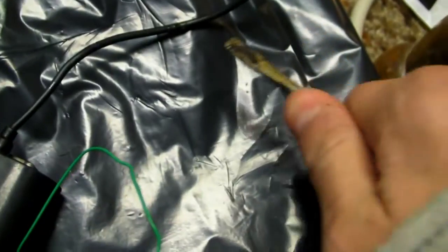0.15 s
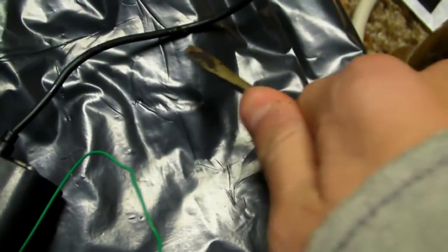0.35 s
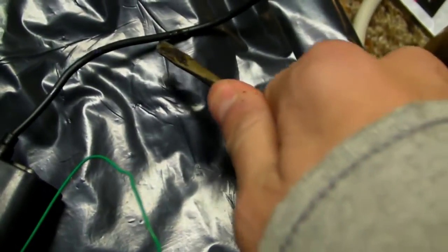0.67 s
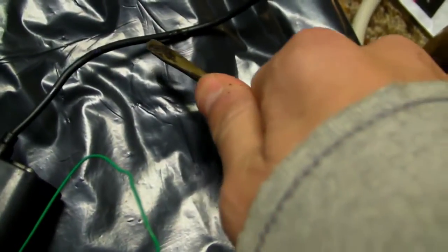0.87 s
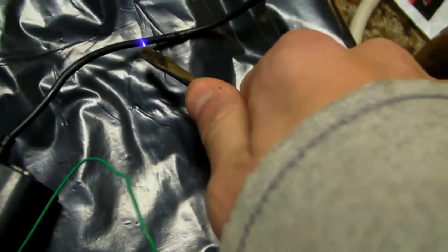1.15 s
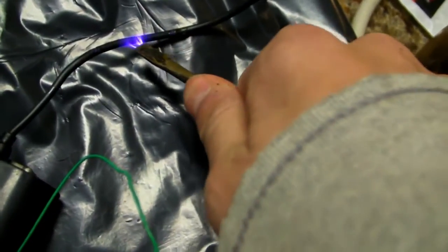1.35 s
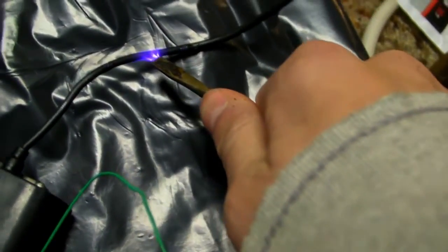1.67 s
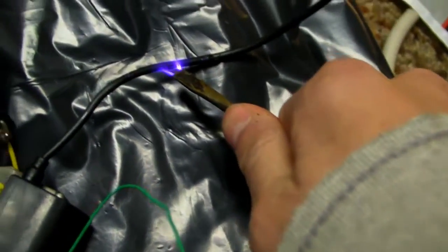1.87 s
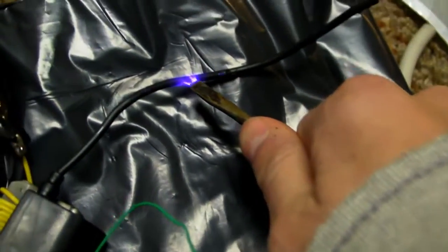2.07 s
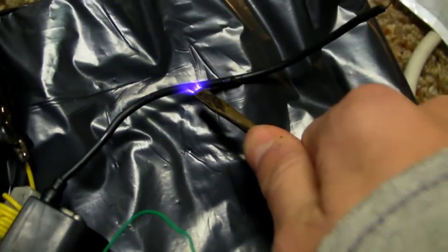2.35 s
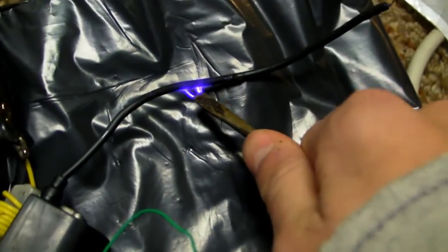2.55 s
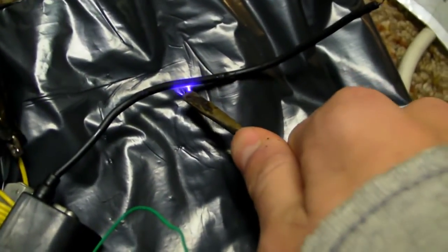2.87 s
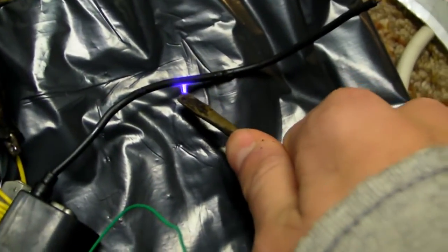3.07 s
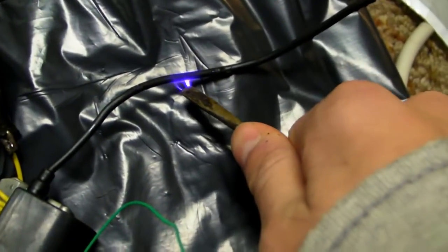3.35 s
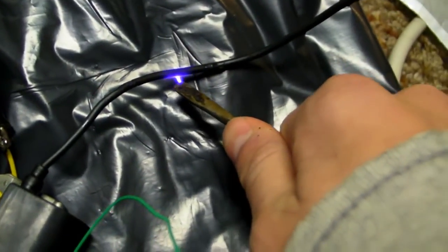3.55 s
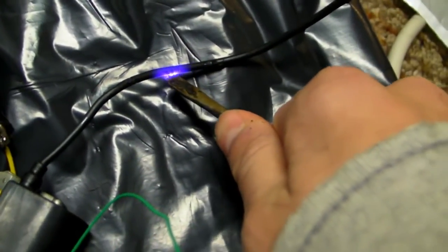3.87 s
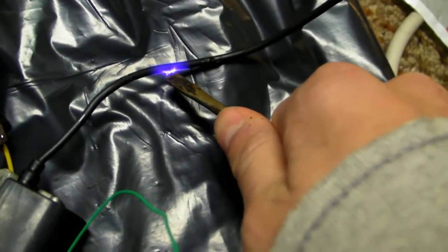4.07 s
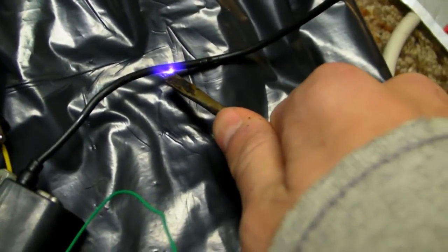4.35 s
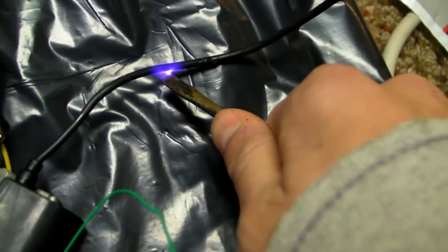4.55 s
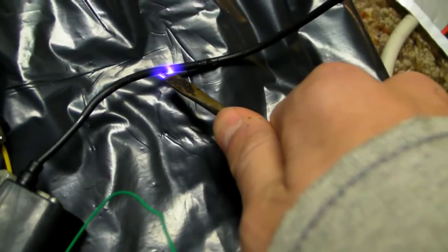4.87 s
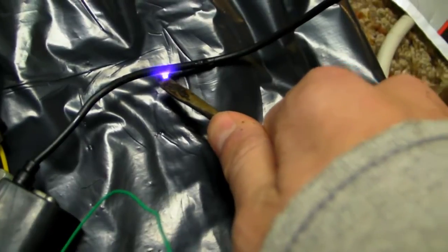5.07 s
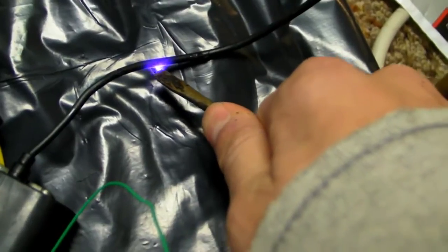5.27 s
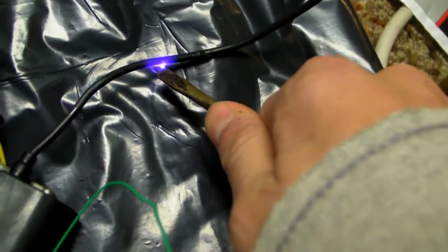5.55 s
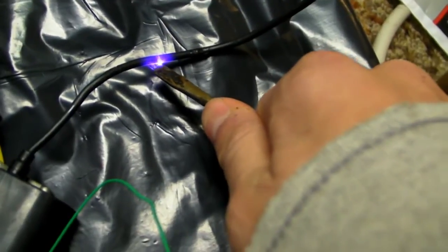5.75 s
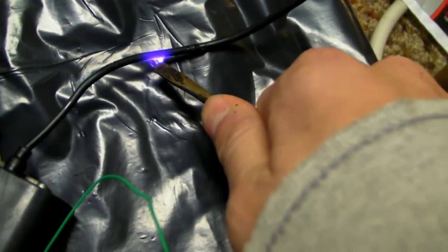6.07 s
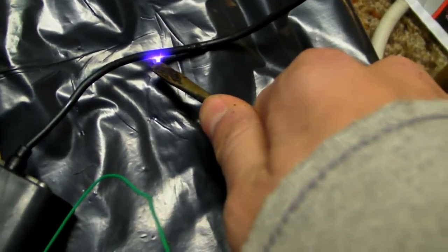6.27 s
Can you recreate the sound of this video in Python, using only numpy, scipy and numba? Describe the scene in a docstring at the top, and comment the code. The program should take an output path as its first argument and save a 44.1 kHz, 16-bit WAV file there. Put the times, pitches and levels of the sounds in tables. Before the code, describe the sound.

Close, dry stereo indoors, thin and bright with little bass. From 0 to about 1.2 s a powered wire, slightly left, gives a steady, thin, very high buzz and narrow whine around 10 kHz, pulsing rapidly at twice the mains rate, over broad hiss. A soft wavering tone near 390 Hz swells briefly several times among faint low blips. From about 0.9 s the buzz sags as the metal tip nears; around 1.1 s a shrill fizz rises. At 1.2 s the discharge jumps: the wire buzz dies within a fraction of a second and a continuous raspy sizzle, a piercing whistle near 13 to 14 kHz and a buzzing hum around 1 to 1.5 kHz take over. Isolated snaps come at 1.4, 2.3 and 2.7 s. After 3.1 s sharp sparks crowd in, densest near 3.2-3.6 s, then keep cracking irregularly while the sizzle slowly grows, surging and flickering, still burning when it stops at 6.4 s.

```python
"""Indoors, a stereo microphone hears a thin buzz along an insulated high-voltage wire, over room hiss.
A low tone swells among brief faint tones while a screwdriver tip nears the wire.
At 1.2 s a purple discharge jumps to the tip: the wire fades, whistle, sizzle and hum take over.
Single sparks follow, most of them after 3 s. The supply ripples at twice the mains rate, so wire
and tip discharges, made of random pulses, burn mostly in set parts of each ripple cycle."""
import sys
import numpy as np
from scipy import signal
from scipy.fft import rfft, irfft
from scipy.io import wavfile
from scipy.ndimage import uniform_filter1d
from numba import njit

SR = 44100
rng = np.random.default_rng(int(sys.argv[2]) if len(sys.argv) > 2 else 0)


def master_out(mix):
    """Clip the mix to full scale and print it as 16-bit PCM to the path in sys.argv[1]."""
    frames = np.transpose(np.atleast_2d(mix))
    ceiling = np.clip(frames, -1, 1)
    pcm = np.round(ceiling * 32767).astype(np.int16)
    wavfile.write(sys.argv[1], SR, pcm)


def linear_from_db(decibels):
    """Turn decibels (scalar or array-like) into linear amplitude factors; 0 gives 1."""
    return 10 ** (np.asarray(decibels, float) / 20)


N = 282636
RIPPLE_HZ = 120.03
STRIKE_S = 1.195   # the discharge jumps to the tip


# Glow at the tip as the hand moves: t/s, lower whistle level/dB, upper whistle level/dB, middle f/Hz
# (levels before the trims in tip_whistle)
TIP_GLOW = [(1.1, -40, -40, 13600), (1.25, -32, -34, 13500), (1.28, -26, -38, 13700),
            (1.34, -33, -39, 13400), (1.37, -29, -27, 13900), (1.42, -36, -34, 13500),
            (1.47, -28, -31, 14000), (1.51, -30, -34, 13100), (1.63, -31, -30, 14100),
            (1.65, -33, -34, 13500), (1.76, -29, -36, 14000), (1.87, -33, -34, 13800),
            (1.9, -28, -35, 13800), (2.09, -30.5, -27.5, 13700), (2.53, -30, -24, 13500),
            (2.7, -32, -33, 13900), (2.99, -31, -24, 13500), (3.1, -30, -33, 14000),
            (3.35, -28, -30, 14100), (3.38, -24, -27, 13700), (3.41, -32, -29, 14200),
            (3.51, -26, -26, 13400), (3.57, -31, -26, 13600), (3.7, -26, -26, 13800),
            (3.91, -30, -30, 13500), (4.12, -30.5, -32, 13700), (4.32, -29, -25, 13400),
            (4.34, -27, -32.5, 13600), (6.35, -29, -29.5, 13400), (6.41, -32, -25, 13600)]
# Surges of the sizzle as the hand trembles: t/s, level/dB added
TREMBLE_SURGES = [(2.482, 2), (2.78, 2), (3.18, 3), (3.5, 3), (3.67, 3), (4.06, -1.5), (4.278, 3),
                  (4.4, -1), (4.75, 3.5), (4.85, -3), (5.08, 3), (5.451, 1), (5.62, 0.5), (5.7, -1),
                  (5.98, 1.5)]


def tip_levels():
    """Glow brightens and sizzle rises as the tip nears; after the strike the sizzle grows slowly and surges."""
    t = np.arange(N) / SR
    onset_db_per_s, faint_db = 100, -57   # glow before the first row
    lower_db, upper_db, middle_hz = in_time(TIP_GLOW)
    before_db = onset_db_per_s * np.maximum(TIP_GLOW[0][0] - t, 0)
    lower_db = np.maximum(lower_db - before_db, faint_db)
    upper_db = np.maximum(upper_db - before_db, faint_db)

    strike_db, rise_db_per_s, growth_db_per_s = -34, 44, .5
    build_s, fall_s = 0.043, 0.082
    since = t - STRIKE_S
    sizzle_db = strike_db + np.where(since < 0, rise_db_per_s, growth_db_per_s) * since
    for s, surge_db in TREMBLE_SURGES:
        sizzle_db += surge_db * np.exp(-np.abs(t - s) / np.where(t < s, build_s, fall_s))
    return (lower_db, upper_db, middle_hz), sizzle_db


# Parts of the ripple cycle in which the sizzle burns: start/cycle, end/cycle, level/dB
SIZZLE_BURNS = [(.0, .25, 0), (.25, .7, -3)]
# Part of the cycle in which sparks and ticks burn: start/cycle, end/cycle, level/dB
SPARK_BURNS = [(.04, .22, 0)]
# Colour of streamers and ticks: f/Hz, level/dB
SIZZLE_COLOUR = [(530, -78), (850, -64), (980, -25), (1170, -6), (1290, -3), (2100, -3.5), (2310, -5.5),
                 (3030, 1.5), (4520, 3), (5100, -0.5), (6260, 2), (8040, 0), (10300, 3), (12000, 2.5),
                 (14500, -12), (16000, -3.5)]
# Sparks by pitch: centre f/Hz, level/dB over the sizzle
SPARK_PITCHES = [(1900, -30), (4200, -24), (6800, -21), (10000, -29)]


def tip_sizzle(level_db):
    """Fine streamers burn through much of the cycle; dry ticks and sparks gather at its voltage peak."""
    streamers = crackle(9000, spread_db=3.0) * burning(SIZZLE_BURNS, off_db=-2, uneven_db=1.2)
    streamers = streamers * linear_from_db(1.05 * drift(22))
    sound = linear_from_db(5.5) * heard(streamers, SIZZLE_COLOUR, lag=0.94)
    ticks = crackle(500, spread_db=3.0) * burning(SPARK_BURNS, off_db=-20, uneven_db=2.0)
    sound = sound + linear_from_db(-5) * heard(ticks, SIZZLE_COLOUR, lag=0.79)
    for hz, spark_db in SPARK_PITCHES:
        sparks = crackle(600, spread_db=3.2) * burning(SPARK_BURNS, off_db=-30, uneven_db=2.0)
        # colour around the centre, with a small step down at the centre itself
        colour = [(hz / 16, -90), (hz / 8, -50), (hz, -10), (hz, -11.2), (hz * 4, -30)]
        sound = sound + linear_from_db(spark_db) * heard(sparks, colour, lag=1.0)
    return linear_from_db(level_db) * sound


# Which burn of the cycle whistles more: t/s, early over late level/dB
EARLY_OVER_LATE = [(1.2, 9), (2.0, 8), (2.15, -5), (2.6, -6), (2.7, 3), (2.85, -2), (3.3, -8), (3.7, -6),
                   (3.9, -1), (6.41, -1)]
# Early burns of the whistle: start/cycle, end/cycle, level/dB
EARLY_BURNS = [(.96, 1.11, 0), (.19, .25, -3)]
# Late burns of the whistle: start/cycle, end/cycle, level/dB
LATE_BURNS = [(.3, .38, 2), (.38, .67, 0)]
# Colour of the blips ahead of their resonance: f/Hz, level/dB
WHISTLE_COLOUR = [(600, -80), (1500, -12), (8000, -2), (11900, -3), (12700, -1.5), (14000, 2), (15200, 8.5),
                  (16000, 13)]


def tip_whistle(lower_db, upper_db, middle_hz):
    """The glow fires very short blips that ring near two high pitches, in early and late burns."""
    below_hz, above_hz, width_hz = 480, 430, 1700
    early_db = in_time(EARLY_OVER_LATE)[0]
    voices = ((lower_db + 2.0, middle_hz - below_hz), (upper_db + 2.4, middle_hz + above_hz))
    out = 0
    for level_db, centre_hz in voices:
        early = linear_from_db(early_db / 2) * burning(EARLY_BURNS, off_db=-13.0, uneven_db=2.0)
        late = linear_from_db(-early_db / 2) * burning(LATE_BURNS, off_db=-4.5, uneven_db=1.0)
        gate = early + late
        gate = gate / np.sqrt(uniform_filter1d(gate ** 2, size=4000))   # level stays even over cycles
        blips = heard(crackle(2000, spread_db=3) * gate, WHISTLE_COLOUR, lag=3.77)
        for _ in range(2):
            blips = resonate(blips, centre_hz, np.exp(-np.pi * width_hz / SR), SR)
        out = out + linear_from_db(level_db) * rms_one(blips)
    return out


# Single loud sparks: t/s, peak level/dB before a common trim, centre f/Hz
LOUD_SPARKS = [(1.43, -12, 9820), (2.2741, -10, 9700), (2.6982, -8, 9100), (3.1401, -16, 8470),
               (3.191, -3.5, 11200), (3.2898, -8, 11100), (3.343, -18, 4310), (3.439, -2.5, 10900),
               (3.464, -8, 11300), (3.48, -3, 11200), (3.5392, -12, 6150), (3.5893, -7, 10700),
               (3.6066, -12, 4740), (3.63, -4, 9530), (4.015, -11, 8730), (4.0144, -18, 4140),
               (4.048, -10, 9560), (4.0564, -10.5, 4240), (4.289, -10, 5390), (4.381, -9, 3770),
               (4.598, -7.5, 6960), (4.6476, -21, 3180), (4.6559, -7, 4030), (4.725, -21, 3860),
               (4.8478, -11, 9910), (5.0805, -6.5, 6200), (5.124, -11, 3500), (5.18, -6, 10800),
               (5.23, -17, 3900), (5.3476, -10, 5400), (5.413, -10, 7540), (5.4314, -9, 11400),
               (5.572, -14.5, 3600), (5.672, -11, 5500), (5.7148, -8, 7330), (5.757, -10, 6340),
               (5.839, -10, 6170), (5.9972, -6.5, 7200), (6.074, -14, 3880), (6.0894, -8, 6100),
               (6.1225, -15.5, 3200), (6.1567, -12, 6350), (6.2384, -9, 6350), (6.363, -16, 3900),
               (6.3808, -9, 8940)]


def snaps():
    """Each loud spark is a burst of noise a few milliseconds long around its own pitch."""
    build_s, dies_s, trim_db = 0.0014, 0.0008, -2
    out, t = np.zeros((2, N + 256)), np.arange(256) / SR
    fade_s = np.where(t < build_s, dies_s / 2, dies_s)
    envelope = np.exp(-np.abs(t - build_s) / fade_s)
    noises = rng.standard_normal((len(LOUD_SPARKS), 2, 256))
    for (s, peak_db, hz), noise in zip(LOUD_SPARKS, noises):
        edges = np.clip(hz * 2 ** (0.5 * np.array([-1, 1])), 500, 16000)   # half an octave each way
        burst = (noise[0] + 0.23 * noise[1] * np.array([[1], [-1]])) * envelope
        burst = signal.sosfilt(signal.butter(2, edges, "band", fs=SR, output="sos"), burst)
        start = int(s * SR)
        out[:, start:start + 256] += linear_from_db(peak_db + trim_db) * burst / np.abs(burst).max()
    return out[:, :N]


def wire_level():
    """Corona level in dB: steady, sags as the tip nears, dies away once the tip takes the current."""
    steady_db, sag_db_per_s, sag_lead_s, quench_db_per_s, rest_db = -28, 10, 0.31, 68, -50
    since = np.arange(N) / SR - STRIKE_S
    level_db = steady_db - sag_db_per_s * np.maximum(since + sag_lead_s, 0)
    level_db = level_db - quench_db_per_s * np.maximum(since, 0)
    return np.maximum(level_db, rest_db)


# Parts of the ripple cycle in which the wire burns: start/cycle, end/cycle, level/dB
WIRE_BURNS = [(.24, .31, -1), (.64, .85, 0)]
# Colour of the corona pulses: f/Hz, level/dB
WIRE_COLOUR = [(500, -82), (1000, -17.5), (4000, -5.5), (7000, -4.5), (9000, 8.5), (10200, 8), (11200, 1.5),
               (16000, -20)]


def wire_buzz():
    """Dense corona pulses in two burns a cycle; their 10.2 kHz ringing sags as each burn dies."""
    t = np.arange(N) / SR
    pulses = crackle(25000, spread_db=2.0) * burning(WIRE_BURNS, off_db=-14, uneven_db=1.5)
    share = t * RIPPLE_HZ % 1   # place within the cycle
    sag = sum(np.clip((share - end) / .05 + 1, 0, 1) * (share < end + .06) for _, end, _ in WIRE_BURNS)
    broad = heard(pulses, WIRE_COLOUR, lag=-4.0)
    ringing = rms_one(resonate(broad, 10200 - 900 * sag ** 2, np.exp(-np.pi * 260 / SR), SR))

    # the supply's own narrow whine keeps its pitch from burn to burn
    whine_hz, wander_hz, whine_db, ends_s, end_db_per_s = 10180, 90, -2.5, 1.16, 120
    turns = np.cumsum(whine_hz + wander_hz * drift(110)) / SR
    whine = np.sin(2 * np.pi * (turns + np.array([[.09], [-.09]])))
    whine = rms_one(whine * burning(WIRE_BURNS, off_db=-9, uneven_db=.5))
    whine = whine * linear_from_db(whine_db - end_db_per_s * np.maximum(t - ends_s, 0))
    return linear_from_db(wire_level()) * (whine + linear_from_db(-31.0) * ringing + linear_from_db(-1.5) * broad)


# Buzz of the discharge current: multiple of the ripple f, level/dB over the sizzle
HUM_LINES = [(4, -31.5), (6, -38.5), (8, -33), (9, -29.5), (10, -26), (11, -23.5), (13, -26), (16, -40)]


def hum(sizzle_db):
    """Multiples of the ripple follow the discharge, each wavering in level and phase."""
    cycles = np.arange(N) / SR * RIPPLE_HZ
    lines = 0
    for multiple, db in HUM_LINES:
        phase = rng.random() + 0.071 * drift(11.0)
        lines = lines + linear_from_db(db + 2.0 * drift(17.0)) * np.sin(2 * np.pi * (multiple * cycles + phase))
    return np.sqrt(2) * linear_from_db(np.maximum(sizzle_db, -40)) * lines


# Swells of the low tone: start t/s, length t/s, level/dB before a common trim
TONE_SWELLS = [(0.06, 0.11, -35.5), (0.22, 0.058, -38), (0.368, 0.077, -29), (0.476, 0.065, -35),
               (0.593, 0.15, -32), (0.704, 0.12, -32.5), (0.975, 0.061, -34.5), (1.048, 0.1, -30),
               (1.216, 0.093, -25), (1.355, 0.14, -41), (1.494, 0.1, -41), (2.46, 0.099, -43),
               (2.594, 0.064, -43), (2.759, 0.031, -35.5), (2.868, 0.082, -30.5), (2.954, 0.036, -45),
               (3.346, 0.091, -35), (3.46, 0.12, -37), (4.13, 0.089, -41), (4.418, 0.063, -42),
               (4.503, 0.093, -40), (4.608, 0.062, -52), (4.68, 0.073, -41), (4.91, 0.053, -45),
               (4.758, 0.062, -42), (5.115, 0.028, -37), (5.198, 0.025, -37), (5.547, 0.042, -37)]


def low_tone():
    """A wavering sine swells and sinks, shifting a little from side to side."""
    tone_hz, rest_db, flutter_db, trim_db = 392.6, -53.5, 2, -6
    gain = linear_from_db(rest_db + flutter_db * drift(8.2))
    for start, length, db in TONE_SWELLS:
        gain += linear_from_db(db + trim_db) * plateau(start + length / 2, 0.51 * length)
    wave = np.sin(2 * np.pi * np.cumsum(tone_hz + 3.58 * drift(11.5)) / SR)
    tone = gain * dropouts() * linear_from_db(1.0 * drift(36)) * wave
    return np.sqrt(2) * tone * linear_from_db(1.8 * drift(4.0) * [[1], [-1]])


# Brief faint tones, 100 to 960 Hz: middle t/s, f/Hz, level/dB
FAINT_TONES = [(0.12, 237, -50), (0.24, 165, -56), (0.324, 120, -55), (0.37, 230, -55), (0.46, 231, -56),
               (0.485, 105, -63), (0.58, 254, -57), (0.645, 216, -57), (0.73, 246, -55), (0.83, 100, -64),
               (0.88, 245, -56), (0.95, 225, -57), (1.04, 183, -55), (1.23, 225, -52), (3.017, 118, -52),
               (3.62, 119, -50), (3.807, 118, -52), (4.015, 118, -51), (5.2, 135, -59), (5.338, 118, -51),
               (3.62, 613, -49), (3.64, 960, -49), (3.73, 764, -51), (3.76, 724, -50), (3.85, 488, -54),
               (4.06, 726, -52), (4.22, 660, -46), (4.27, 635, -50), (4.335, 960, -53), (4.385, 716, -50.5),
               (4.48, 540, -56), (4.685, 615, -49), (4.805, 729, -49), (4.825, 550, -57), (5.01, 580, -55),
               (5.125, 745, -52), (5.175, 640, -49), (5.31, 790, -51), (5.38, 726, -54), (5.38, 865, -53),
               (5.51, 535, -48)]


def faint_tones():
    """Each is a sine under a soft hump some hundredths of a second long."""
    t = np.arange(N) / SR
    out = 0
    for s, hz, db in FAINT_TONES:
        hump = np.exp(-((t - s) / 0.015) ** 2)
        out = out + linear_from_db(db) * hump * np.sin(2 * np.pi * hz * t)
    return np.sqrt(2) * out


# Dips of low tone and murmurs: middle t/s, length t/s, depth level/dB
LOW_DROPOUTS = [(0.92, 0.082, 2), (2.216, 0.021, 7), (2.412, 0.049, 11), (2.688, 0.04, 28),
                (3.037, 0.026, 23), (3.414, 0.032, 37), (3.873, 0.031, 21), (5.015, 0.02, 13),
                (5.05, 0.031, 24), (5.458, 0.076, 57), (5.885, 0.02, 27), (6.288, 0.018, 8)]


def dropouts():
    """Gain under which the low tone and the murmurs briefly dip."""
    return linear_from_db(-sum(depth_db * plateau(s, length / 2) for s, length, depth_db in LOW_DROPOUTS))


# Background: t/s, murmur level/dB around the low tone, upper murmur level/dB, hiss level/dB
ROOM_LEVELS = [(0, -48.5, -52, -25.5), (0.8, -45.5, -52, -26.5), (1.2, -42.5, -48, -27),
               (1.5, -52.5, -51.5, -25), (2.3, -56, -52, -28), (2.42, -52, -62, -32),
               (2.55, -53.5, -51, -26.5), (3.2, -47.5, -49, -24), (3.36, -56, -53.5, -23.5),
               (3.45, -51.5, -72, -26), (4.4, -52.5, -76, -25.5), (5.4, -50.5, -73.5, -27),
               (5.6, -53.5, -77, -23), (5.86, -58.5, -73, -28), (5.92, -51.5, -51, -27),
               (6.185, -48, -57.5, -25), (6.215, -55, -45, -26), (6.245, -54, -49, -21.5),
               (6.41, -48.5, -62, -27.5)]
# Colour of the murmur: f/Hz, level/dB
MURMUR_COLOUR = [(200, -70), (280, -45), (320, -14), (350, -2), (395, 2), (440, -4), (470, -14), (500, -40),
                 (700, -70)]
# Colour of the upper murmur: f/Hz, level/dB
UPPER_COLOUR = [(300, -70), (450, -27), (490, 1), (550, 3), (630, 2.5), (720, 4), (850, -5), (980, -2),
                (1100, -15), (1400, -43)]
# Colour of the hiss: f/Hz, level/dB
HISS_COLOUR = [(500, -78), (800, -42), (1150, -6), (1350, -12), (1600, -1), (2000, 0), (2800, 1.5),
               (3900, 9), (5800, 4.5), (7600, 10.5), (9500, 10.5), (11800, 7), (13300, 14), (16000, 13)]


def room_hiss():
    """Smooth broad noise of the room and supply: two low murmurs and a hiss."""
    murmur_db, upper_db, hiss_db = in_time(ROOM_LEVELS)
    murmur = linear_from_db(murmur_db) * heard(rng.standard_normal((2, N)), MURMUR_COLOUR, lag=0)
    upper = linear_from_db(upper_db) * heard(rng.standard_normal((2, N)), UPPER_COLOUR, lag=0)
    hiss = linear_from_db(hiss_db) * heard(rng.standard_normal((2, N)), HISS_COLOUR, lag=0.46)
    return dropouts() * (murmur + upper) + hiss


# Likeness of the left and right microphone channels: f/Hz, share 0-1
LIKENESS = [(200, 0.4), (2500, 0.8), (3300, 0.77), (4500, 0.42), (8000, 0.62), (9500, 1), (11000, 0.13),
            (13500, 0.77), (16000, 0.42)]


def heard(pair, colour, lag):
    """Colour a sound; the channels lie lag samples apart, blended with a twin scattered by the room."""
    hz = np.fft.rfftfreq(N, 1 / SR)
    direct, scattered = rfft(pair) * linear_from_db(at_hz(colour, hz))
    alike = np.clip(at_hz(LIKENESS, hz), 0, 1)
    sides = np.array([[1], [-1]])
    delay = np.exp(-1j * np.pi * hz * lag / SR * sides)
    blend = np.sqrt(1 + alike) * direct + np.sqrt(1 - alike) * scattered * sides
    return rms_one(irfft(delay * blend, N))


def burning(burns, off_db, uneven_db):
    """Gain that opens in the given parts of each ripple cycle, each burn with a strength of its own."""
    cycles = np.arange(N) / SR * RIPPLE_HZ
    gate = np.full(N, linear_from_db(off_db))
    for start, end, level_db in burns:
        since = cycles - start + 1
        chance = np.clip(rng.standard_normal(int(since[-1]) + 1), -2, 2)
        strength = linear_from_db(level_db + uneven_db * chance)
        gate += (since % 1 < end - start) * strength[since.astype(int)]
    return uniform_filter1d(gate, size=12)


def crackle(per_s, spread_db):
    """Two trains of tiny discharges at random moments, a few much larger than the rest."""
    sizes = linear_from_db(spread_db * np.minimum(rng.exponential(1, (2, N)), 4.0))
    sizes = sizes * rng.choice([-1, 1], (2, N))
    return sizes * (rng.random((2, N)) < per_s / SR)


@njit
def resonate(x, hz, r, sr):
    """Two-pole resonance with a moving centre; r is the pole radius."""
    y = np.zeros_like(x)
    for i in range(2, x.shape[1]):
        turn = 2 * r * np.cos(2 * np.pi * hz[i] / sr)
        y[:, i] = x[:, i] - x[:, i - 2] + turn * y[:, i - 1] - r * r * y[:, i - 2]
    return y


def drift(rate_hz):
    """Low-passed noise of rms 1, wandering at about the given rate."""
    r = np.exp(-2 * np.pi * rate_hz / SR)
    noise = rng.standard_normal(N + SR)
    return rms_one(signal.lfilter([1], [1, -2 * r, r * r], noise)[SR:])   # first second settles


def plateau(middle, half):
    """A hump with a held top and quick flanks; times in s."""
    return np.exp(-((np.arange(N) / SR - middle) / half) ** 4)


def in_time(rows):
    """Columns of a table as curves, one value a sample."""
    s, *columns = np.transpose(rows)
    return [np.interp(np.arange(N) / SR, s, c) for c in columns]


def at_hz(points, hz):
    """Read a spectrum on a log-frequency axis."""
    points_hz, values = np.transpose(points)
    return np.interp(np.log(hz + 1), np.log(points_hz), values)


def rms_one(x):
    """Scale to rms 1."""
    return x / np.sqrt(np.mean(x ** 2) + 1e-20)


def scene():
    """All sources, the wire a little to the left; the faint tones are added after the low cut."""
    glow, sizzle_db = tip_levels()
    tip = tip_whistle(*glow) + tip_sizzle(sizzle_db) + snaps()
    tip = tip * linear_from_db(np.array([[.4], [-.4]]))
    wire = wire_buzz() * linear_from_db(np.array([[2.4], [-2.4]]))
    thin = wire + tip + hum(sizzle_db) + low_tone() + room_hiss()
    low_cut = signal.butter(8, 290, "high", fs=SR, output="sos")
    return signal.sosfilt(low_cut, thin) + faint_tones()


def top_cut(x):
    """Nothing passes above the cut-off."""
    return signal.sosfilt(signal.butter(12, 15720, fs=SR, output="sos"), x)


def record(dry):
    """The microphone signal gets a narrow notch near 7.9 kHz and a drooping top."""
    notch = signal.butter(1, [7740, 8060], "bandstop", fs=SR, output="sos")
    top = signal.butter(8, 15500, fs=SR, output="sos")
    mix = signal.sosfilt(np.vstack([notch, top]), dry)
    return top_cut(mix)


dry = scene()
out = record(dry)
master_out(out)
```